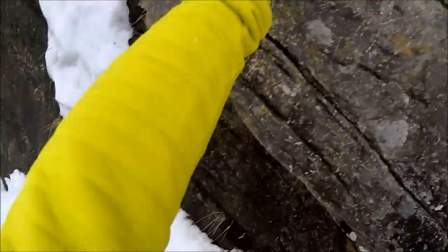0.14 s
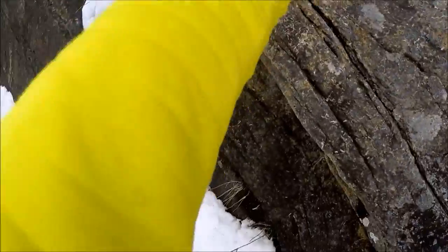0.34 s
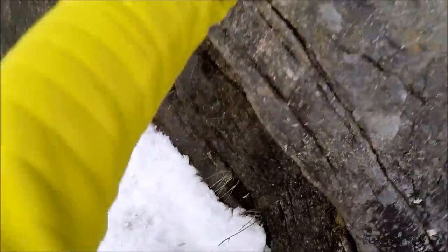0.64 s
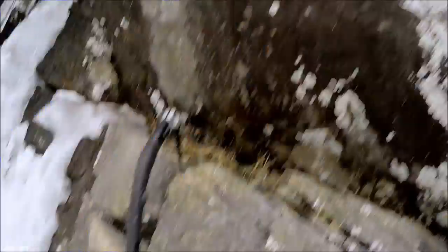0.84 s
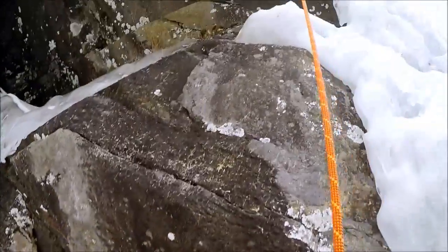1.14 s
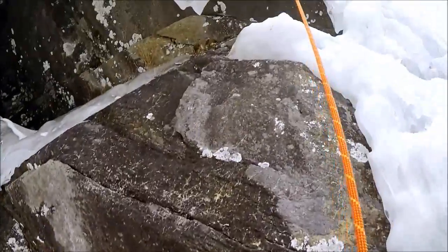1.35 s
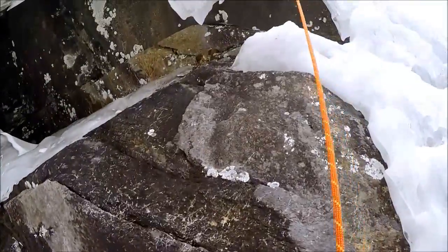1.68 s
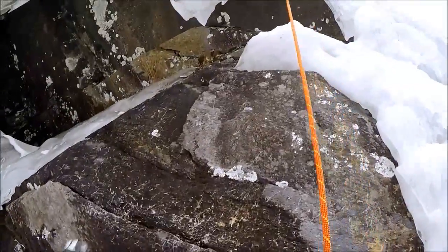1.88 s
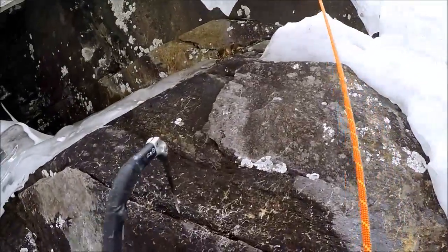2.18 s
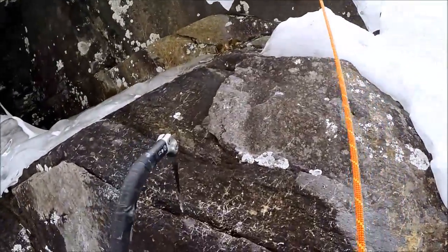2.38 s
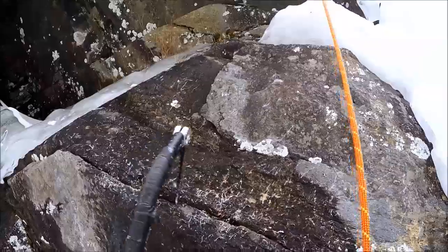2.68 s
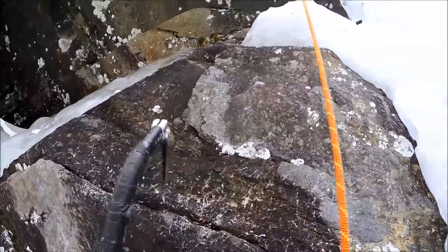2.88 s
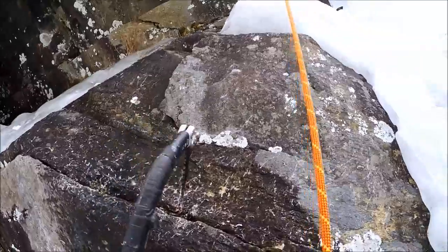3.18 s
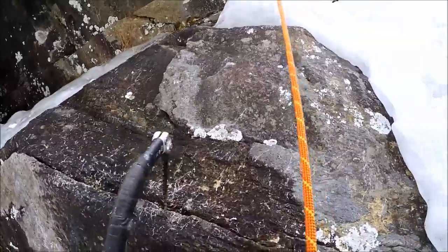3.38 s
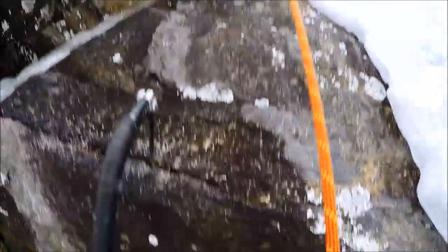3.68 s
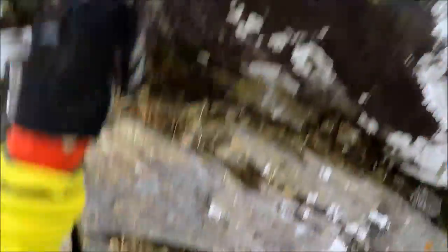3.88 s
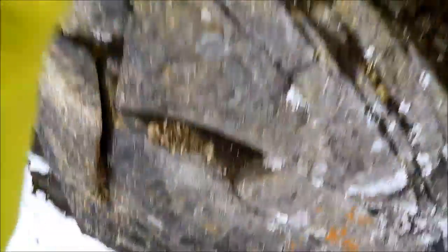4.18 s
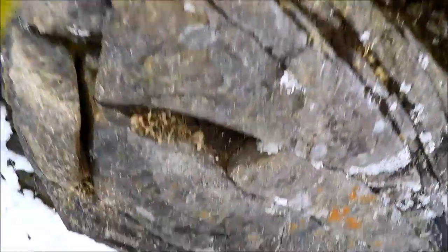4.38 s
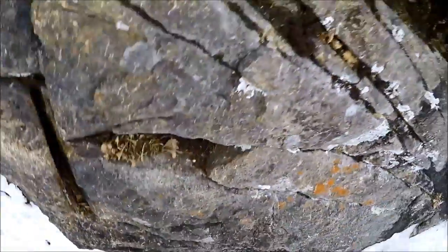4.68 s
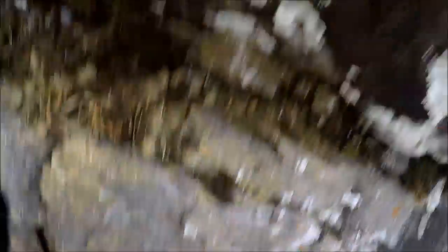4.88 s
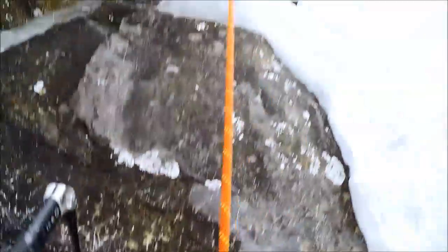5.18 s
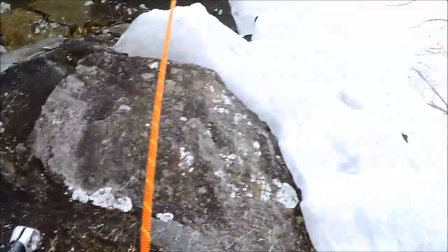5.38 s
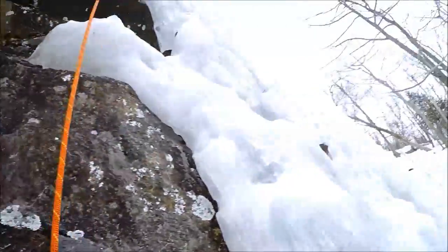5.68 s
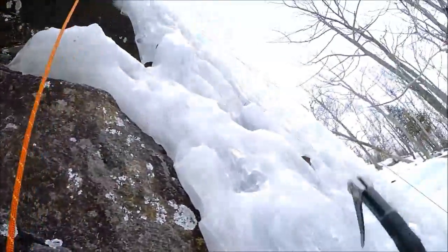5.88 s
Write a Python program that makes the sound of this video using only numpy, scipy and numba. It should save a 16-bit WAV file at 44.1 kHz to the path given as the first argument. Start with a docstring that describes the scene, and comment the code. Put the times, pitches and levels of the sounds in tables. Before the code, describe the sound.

Outdoors on a snowy rock step, heard from a small sealed camera on a climber's helmet. Low wind rumble, then almost at once a rapid clatter of hard, clipping knocks and gritty scraping on the housing. Steel tools tick and scuff on stone, with dull thuds and jacket rustle. A calmer middle leads to one violent knock around four seconds, a lighter scrape, then wind.

```python
"""Low wind rumble comes first, and almost at once hard knocks on a small sealed camera worn on a helmet.
The place is a rock step: gusts and head turns push slow pressure swings into the camera's one microphone.
Knocks and drags over rock ring the housing's modes; the hardest overload it and the gain ducks.
Between them noise bursts ring steel tools on stone, jolts thud through the helmet, filtered noise and
clicks make a jacket rustle, and wavering tones squeak a strap, over the camera's own hiss and whine."""
import sys
import numpy as np
from scipy import signal
from scipy.fft import rfft, irfft
from scipy.io import wavfile
from scipy.ndimage import uniform_filter1d
from numba import njit

SR = 44100
rng = np.random.default_rng(int(sys.argv[2]) if len(sys.argv) > 2 else 0)


def decibels_to_gain(level_db):
    """Convert a level in decibels to a linear amplitude gain (20 dB per decade)."""
    exponent = np.asarray(level_db, float) / 20
    return 10 ** exponent


def unload_audio(sound):
    """Save the sound as a 16-bit wav file, at the path given as the first command line argument."""
    columns = np.transpose(np.atleast_2d(sound))
    # keep every value between -1 and 1, then stretch to whole-number steps
    steps = np.round(np.clip(columns, -1, 1) * 32767)
    wavfile.write(sys.argv[1], SR, steps.astype(np.int16))


N = 266805
T = np.arange(N) / SR


def colour(x, shape):
    """Noise or clicks through a smooth spectrum of (Hz, dB) points, rms 1."""
    hz, db = np.transpose(shape)
    f = np.maximum(np.fft.rfftfreq(len(x), 1 / SR), 1)
    gain = decibels_to_gain(np.interp(np.log(f), np.log(hz), db))
    y = irfft(rfft(x) * gain, len(x))
    return y / np.sqrt(np.mean(y ** 2))


def ring(x, hz, t60):
    """One decaying mode; it falls 60 dB in t60 seconds and a unit impulse rings with amplitude near 1."""
    pole = np.exp(2j * np.pi * hz / SR - np.log(1000) / (t60 * SR))
    return signal.lfilter([1], [1, -pole], x).imag


def resonances(x, modes):
    """Sum of (Hz, width in Hz, dB) resonances with alternating signs, peak 1."""
    y = np.zeros(len(x))
    for k, (hz, width, db) in enumerate(modes):
        t60 = np.log(1000) / np.pi / width
        y += (-1) ** k * decibels_to_gain(db) * width * ring(x, hz, t60)
    return y / np.abs(y).max()


def favour(hz, near_hz, lift, spread):
    """Modes near the one that the point of contact favours get most of the lift."""
    return lift * np.exp(-(np.log(hz / near_hz) / spread) ** 2)


def walk(rate):
    """Random levels held 1 / rate seconds and slewed twice; spread near 1."""
    k = int(SR / rate)
    steps = np.repeat(rng.standard_normal(N // k + 1), k)
    return 1.4 * uniform_filter1d(uniform_filter1d(steps, k), k)[:N]


def crackle(rate, spread_db):
    """Clicks at random moments, rate per second, a few much larger than the rest."""
    u = rng.random((3, N))
    size = decibels_to_gain(-spread_db * np.log(1 - u[2]))
    return (u[0] < rate / SR) * np.sign(u[1] - 0.5) * size


def swells(curve, events, fall_per_rise):
    """Level in dB: a slow curve, plus bell-shaped swells whose fall time is fall_per_rise times the rise."""
    power = decibels_to_gain(2 * np.interp(T, *np.transpose(curve)))
    for s, db, rise in events:
        side = rise * np.where(T < s, 1, fall_per_rise)
        power += decibels_to_gain(2 * db) * np.exp(-((T - s) / side) ** 2)
    return 10 * np.log10(power)


def add(out, s, x):
    """Mix x into out from time s in seconds."""
    i = int(s * SR)
    out[i:i + len(x)] += x[:N - i]


# Modes of the camera's shell. Each row: pitch in Hz, relative level in dB, 60 dB decay time in s.
SHELL_MODES = [(128, -27.5, 0.029), (288.3, -24.5, .08), (388, -23.5, 0.042), (767.7, -3.5, 0.014),
               (921, 3, 0.014), (1382, -4.5, .024), (1655, -9.5, .022), (1880, -32.5, 0.13),
               (2230, -7, 0.022), (2790, -10.5, .018), (2900, -39.5, .09), (3075, -14, 0.012),
               (3900, -10, 0.013), (4900, -26, .012), (5500, -27, .009), (7300, -27.5, .006),
               (10800, -31, .006)]


def shell(drive, near_hz, lift_db):
    """The housing rings in its modes; the contact lifts the nearest and bends them to its pitch."""
    out = np.zeros(len(drive))
    for k, (hz, db, t60) in enumerate(SHELL_MODES):
        level = decibels_to_gain(db + favour(hz, near_hz, lift_db, 0.14))
        bent_hz = hz + (near_hz - hz) * favour(hz, near_hz, 0.8, 0.12)
        out += (-1) ** (k // 2) * level * ring(drive, bent_hz, t60)
    return out


# Knocks on the housing. Each row: start in seconds, relative force in dB, contact time in ms,
# favoured mode in Hz, crack level in dB, thump level in dB.
KNOCKS = [(0.1368, 17, 0.3, 868, 4, -10.5), (0.1572, 14, 0.25, 968, -7.5, -9),
          (0.177, 1, 0.16, 898, -29.5, -27.5), (0.185, -2.5, 0.12, 1380, -31.5, -33.5),
          (0.194, -3.5, 0.054, 890, -23, -28), (0.197, 12.5, 0.087, 1395, -8, -14),
          (0.2039, 12, 0.083, 1380, -2.5, -8.5), (.2135, -1, 0.13, 905, -24, -22.5),
          (.2235, -18, .12, 1390, -27.5, -28), (0.234, -4, 0.2, 1617, -28, -24),
          (4.0838, 22.5, 0.097, 3727, -21.5, -1.5), (4.1002, -20, 0.11, 4330, -27.5, -40),
          (4.7953, 9, 0.071, 821, -13.5, -19), (4.809, -16, 0.095, 1640, -28, -30),
          (4.8486, -12, 0.078, 1690, -19.5, -31), (4.8604, -8, 0.025, 1896, -23.5, -30.5),
          (4.8625, -12, 0.038, 2225, -18.5, -36), (4.868, -17, 0.046, 965, -15.5, -38)]
# Spectrum of the crack. Each row: frequency in Hz, relative density in dB per Hz.
CRACK_SPECTRUM = [(500, -17), (2500, 13.5), (6000, -4), (11000, -13), (15500, -16.5)]


def knocks():
    """A short push rings the shell, cracks as a noise burst and thumps the microphone's membrane."""
    thump_hz, thump_t60_s, thump_lag_s, crack_t60_s = 67, 0.1, 0.002, 0.011
    out, t = np.zeros(N), T[:12000]
    for s, force_db, contact_ms, near_hz, crack_db, thump_db in KNOCKS:
        push = np.exp(-(1000 * t / contact_ms - 2) ** 2)
        push /= push.sum()
        add(out, s, decibels_to_gain(force_db - 10) * shell(push, near_hz, 9.6))
        add(out, s + thump_lag_s, -decibels_to_gain(thump_db) * ring(push, thump_hz, thump_t60_s))
        crack = colour(rng.standard_normal(600), CRACK_SPECTRUM)
        add(out, s, decibels_to_gain(crack_db - 60 * t[:600] / crack_t60_s) * crack)
    return out


# Housing dragged along rock. Each row: start in seconds, length in seconds, level at the start in dB,
# level at the end in dB, grit level relative to these in dB, favoured mode in Hz.
DRAGS = [(0.141, 0.012, -23, -25, 0, 2250), (0.160, .035, -26, -18, -5, 960),
         (0.194, .039, -17, -21, -3, 1380), (4.798, 0.031, -22, -30, -7, 1400),
         (4.831, .019, -35, -29, -8, 2350), (4.850, 0.021, -27, -21, -3, 2700)]
# Spectrum of the grit. Each row: frequency in Hz, relative level in dB.
GRIT_SPECTRUM = [(60, -1), (230, 1), (700, -10), (1500, 3), (3000, -4.5), (5800, -8), (7200, -28.5),
                 (11000, -36), (15000, -38)]


def drags():
    """Small slips ring the shell while grit grinds; after each drag the contact lifts off at once."""
    lift_off_db_per_s = 3998
    out, t = np.zeros(N), T[:12000]
    slips = crackle(700, 3.7)
    # the edge bites and lets go a few hundred times a second
    bite = decibels_to_gain(2.5 * walk(250))
    sand = colour(crackle(9000, 1.8), GRIT_SPECTRUM) * bite
    for s, length, start_db, end_db, grit_db, near_hz in DRAGS:
        i = int(s * SR)
        here = slice(i, i + len(t))
        db = np.interp(t, [0, length], [start_db, end_db])
        db -= lift_off_db_per_s * np.maximum(t - length, 0)
        # the shell's answer to the unshaped slips sets the scale
        scale = shell(slips[here], near_hz, 6).std()
        rung = shell(decibels_to_gain(db) * slips[here], near_hz, 6) / scale
        add(out, s, 1.1 * rung + decibels_to_gain(db + grit_db) * sand[here])
    return out


# Wind on the microphone port. Each row: time in seconds, slow rumble level in dB.
WIND_LEVEL = [(0.0, -37), (0.55, -36), (1.15, -37), (1.85, -41), (2.1, -37.5), (2.45, -43.5), (2.9, -38),
              (3.5, -45.5), (3.95, -36.5), (4.45, -36.5), (5.0, -34.5), (5.5, -33), (5.9, -31.5),
              (6.05, -41.5)]
# Buffets as the head turns or a gust slaps the port. Each row: peak time in seconds, peak level in dB,
# rise in seconds.
BUFFETS = [(0.191, -18.5, 0.052), (.419, -17, 0.029), (.85, -27.5, 0.049), (0.955, -18.5, 0.005),
           (1.07, -26.5, 0.013), (1.33, -35.5, 0.035), (1.67, -40.5, .04), (2.181, -30.5, 0.035),
           (2.71, -36.5, 0.028), (3.8, -29.5, 0.078), (4.101, -18, 0.013), (4.271, -16.5, 0.055),
           (4.639, -27.5, 0.036), (4.83, -38, 0.024), (5.142, -19.5, 0.03), (5.64, -26.5, 0.041)]
# Spectra of the slow rumble and of the flutter. Each row: frequency in Hz, relative level in dB.
RUMBLE_SPECTRUM = [(15, -4), (26, 6.5), (52, 7), (64, -5), (80, -25), (140, -66.5), (400, -110)]
FLUTTER_SPECTRUM = [(50, -9.5), (90, 4.5), (170, -19.5), (400, -23), (900, -28.5), (2000, -55),
                    (6000, -97.5)]


def wind():
    """Slow pressure swings under the port's cut-off; a faster uneven flutter grows with them."""
    gust_db = swells(WIND_LEVEL, BUFFETS, fall_per_rise=1.2) + 2 * walk(6.8)
    rumble = colour(rng.standard_normal(N), RUMBLE_SPECTRUM)
    # a gust holds its strength over a few swings, so the envelope is evened out
    rumble /= np.sqrt(uniform_filter1d(rumble ** 2, size=2000) + 0.039)
    flutter_db = 1.072 * gust_db - 23 + 3.5 * walk(25)
    flutter = colour(rng.standard_normal(N), FLUTTER_SPECTRUM)
    return decibels_to_gain(gust_db) * rumble + decibels_to_gain(flutter_db) * flutter


# Modes of the steel and of its edge. Each row: pitch in Hz, width in Hz, relative level in dB.
STEEL_MODES = [(905, 130, -6), (1560, 54, 6), (1886, 270, 5), (2070, 350, 3.5), (2660, 280, -0.5),
               (3420, 250, 0), (3715, 300, -0.5), (4484, 1000, -9.5)]
EDGE_MODES = [(6013, 455, 7.5), (7610, 540, 2), (8360, 160, 5.5), (9970, 760, -1), (12990, 2500, -25.5)]
# Steel on stone. Each row: start in seconds, body peak in dB, edge peak in dB, favoured ring in Hz.
TICKS = [(0.0335, -48.5, -54, 1430), (0.665, -45.5, -38.5, 1600), (0.7718, -48, -71.5, 2120),
         (0.877, -40.5, -36.5, 1053), (0.8866, -27.5, -38, 2390), (0.9373, -41.5, -44, 3740),
         (0.954, -52, -55, 3600), (0.968, -44, -59, 1650), (1.0035, -40, -50, 1440),
         (1.038, -43.5, -61, 1640), (1.119, -55, -56, 2220), (1.1289, -43, -54, 1740),
         (1.176, -50, -58, 1660), (1.274, -44, -47, 1625), (1.3001, -43, -41.5, 1900),
         (1.3357, -61, -45.5, 1703), (1.625, -43.5, -43.5, 1726), (1.635, -49, -48, 1850),
         (1.6461, -38.5, -42, 3900), (1.6716, -32, -37, 3750), (1.729, -43.5, -58, 1560),
         (1.9092, -41.5, -53.5, 2790), (1.9852, -30, -71, 1900), (2.0418, -43.5, -54.5, 1950),
         (2.146, -42, -50.5, 2670), (2.37, -38.5, -56.5, 1950), (2.5457, -36, -50.5, 1580),
         (2.6903, -37, -47.5, 1400), (2.7027, -32, -49, 1950), (3.2581, -34.5, -51.5, 1820),
         (3.4129, -25.5, -37, 3720), (3.4266, -30, -46, 3530), (3.7714, -30, -37, 1870),
         (3.7823, -39, -55, 1730), (4.039, -48, -61, 1650), (4.1886, -38, -48, 1970),
         (4.222, -45, -63.5, 2020), (4.25, -40, -70, 2036), (4.299, -45, -72.5, 2050),
         (4.3343, -39.5, -46, 2090), (4.5391, -37.5, -69.5, 1720), (4.5753, -38.5, -59.5, 1450),
         (4.6, -42.5, -66, 2670), (4.611, -43, -42, 4310), (4.643, -44, -62, 1810),
         (4.6624, -39, -47, 2720), (4.718, -37, -47, 2645), (4.735, -45.5, -56.5, 2800),
         (4.764, -45, -59, 3060), (4.904, -46, -51, 2900), (5.0879, -35, -49, 1980),
         (5.1, -41.5, -54.5, 1700), (5.384, -52, -58, 1605), (5.68, -45.5, -62, 1950)]


def tools():
    """A crisp contact and a gritty tail of scuffing excite the steel; harder blows are drier."""
    contact_t60_s, scuff_t60_s = 0.016, 0.06
    out, t = np.zeros(N), T[:6000]
    for s, db, edge_db, near_hz in TICKS:
        # 9 dB below a -40 dB contact, and 0.7 dB further below for each dB harder
        scuff_db = -9 - 0.7 * (db + 40)
        envelope = decibels_to_gain(-60 * t / contact_t60_s) + decibels_to_gain(scuff_db - 60 * t / scuff_t60_s)
        burst = rng.standard_normal((2, len(t))) * envelope
        modes = [(hz, width, g + favour(hz, near_hz, 3.5, 0.21)) for hz, width, g in STEEL_MODES]
        # the free tip of the pick: its pitch depends on where it touches
        modes.append((near_hz, 0.11 * near_hz, 4))
        add(out, s, decibels_to_gain(db) * resonances(burst[0], modes))
        add(out, s, decibels_to_gain(edge_db) * resonances(burst[1], EDGE_MODES))
    return out


# Jolts of the body. Each row: start in seconds, peak level in dB.
JOLTS = [(0.031, -37.5), (0.384, -45), (0.887, -24), (1.04, -29.5), (1.984, -31.5), (2.142, -43),
         (3.78, -27), (4.188, -24.5), (4.283, -31), (4.465, -42), (4.481, -42.5), (4.538, -25.5),
         (5.087, -27.5), (5.113, -32)]
# Modes of the helmet. Each row: pitch in Hz, width in Hz, relative level in dB.
HELMET_MODES = [(90, 14, 12), (222.2, 110, -4.5), (693, 1500, -14)]


def jolts():
    """Dull thuds travel up the body into the helmet: short noise bursts through its modes."""
    out, t = np.zeros(N), T[:6000]
    for s, db in JOLTS:
        burst = rng.standard_normal(len(t)) * decibels_to_gain(-60 * t / 0.022)
        add(out, s, decibels_to_gain(db) * resonances(burst, HELMET_MODES))
    return out


# How much the climber shifts about. Each row: time in seconds, slow jacket level in dB.
RUSTLE_LEVEL = [(0, -68.5), (.65, -70), (1.0, -68), (1.5, -72), (2.3, -73), (3.0, -76), (3.7, -78.5),
                (4.1, -72.5), (5.3, -71), (6.05, -81.5)]
# Single moves of an arm. Each row: peak time in seconds, peak level in dB, rise in seconds.
MOVES = [(0.121, -56, 0.015), (.42, -60.5, 0.05), (0.779, -66, 0.027), (0.991, -60.5, 0.047),
         (1.15, -68, 0.033), (1.32, -58.5, 0.029), (1.63, -57.5, 0.012), (2.17, -59.5, 0.024),
         (2.379, -62, 0.023), (2.59, -65, 0.023), (3.79, -64, 0.025), (4.21, -52, 0.017), (4.3, -60, 0.018),
         (5.115, -58, 0.023), (5.302, -59, 0.013), (5.401, -58, 0.03)]
# Spectrum of the fabric. Each row: frequency in Hz, relative density in dB per Hz.
CLOTH_SPECTRUM = [(300, -26), (1100, -12), (1600, 0), (2000, -0.5), (2500, -7.5), (3600, -9), (4600, -16),
                  (8000, -19), (15000, -33.5)]


def jacket():
    """Stiff fabric: a hush with fine crackle whose level flickers; the same moves graze steel on stone."""
    creases = crackle(4000, 2.2)
    hush = 0.78 * rng.standard_normal(N)
    fibres = colour(creases + hush, CLOTH_SPECTRUM) * decibels_to_gain(4.5 * walk(150))
    scratch = resonances(crackle(200, 1.4), STEEL_MODES)
    # 3 dB below the cloth before its flicker
    scratch *= decibels_to_gain(-3) / np.sqrt(np.mean(scratch ** 2))
    level_db = swells(RUSTLE_LEVEL, MOVES, fall_per_rise=1) + 1.6 * walk(30)
    return (fibres + scratch) * decibels_to_gain(level_db)


# Squeaks of the strap. Each row: start in seconds, length in seconds, pitch in Hz, level in dB.
SQUEAKS = [(2.963, 0.085, 6530, -69), (3.732, 0.077, 6680, -71)]


def strap():
    """Thin squeaks, wavering in pitch and level, with a weak octave."""
    out, drift, waver = np.zeros(N), walk(27), walk(90)
    for s, length, hz, db in SQUEAKS:
        phase = 2 * np.pi * np.cumsum(hz * (1 + 0.004 * drift)) / SR
        # fades in and out over 11 ms
        swell = np.clip(np.minimum(T - s, s + length - T) / 0.011, 0, 1)
        tone = np.sin(phase) + 0.4 * np.sin(2 * phase)
        out += swell * decibels_to_gain(db + 4 * waver) * tone
    return out


# Spectrum of the preamplifier's hiss. Each row: frequency in Hz, relative level in dB.
HISS_SPECTRUM = [(100, -17), (200, -14), (500, -18.5), (1100, -23), (2500, -21), (6000, -28), (11000, -32),
                 (14500, -31), (16000, -59.5)]


def electronics():
    """Preamplifier hiss as shaped noise, and a steady thin whine as one sine; both levels are rms."""
    hiss_db, whine_db, whine_hz = -64.5, -75.5, 12407.5
    hiss = colour(rng.standard_normal(N), HISS_SPECTRUM)
    whine = np.sqrt(2) * np.sin(2 * np.pi * whine_hz * T)
    return decibels_to_gain(hiss_db) * hiss + decibels_to_gain(whine_db) * whine


def scene():
    """Everything reaches one microphone on the helmet."""
    handling = knocks() + drags()
    climber = tools() + jolts() + jacket() + strap()
    return (wind() + handling + climber + electronics())[None]


@njit
def duck(x, top, attack, hold, release):
    """Gain falls fast while the output overloads, waits, then climbs at a steady rate in dB."""
    y, gain, wait = np.empty(len(x)), 1., 0.
    for i in range(len(x)):
        y[i] = gain * x[i]
        if abs(y[i]) > top:
            gain, wait = gain * attack, hold
        elif wait > 0:
            wait -= 1
        else:
            gain = min(gain * release, 1.)
    return y


def band_limit(x):
    """A steep low-pass at the top of the band."""
    return signal.sosfilt(signal.butter(12, 16530, fs=SR, output="sos"), x)


def record(dry):
    """Gain control lags behind the blows, so their first swings clip; the top is cut."""
    fall_db_per_s, hold_s, climb_db_per_s = 5500, 0.15, 22
    ducked = duck(dry[0], 1.0, decibels_to_gain(-fall_db_per_s / SR), hold_s * SR, decibels_to_gain(climb_db_per_s / SR))
    clipped = np.clip(ducked, -0.92, 0.92)
    low_pass = signal.cheby2(8, 50, 16200, fs=SR, output="sos")
    mix = signal.sosfilt(low_pass, clipped)[None]
    return band_limit(mix)


dry = scene()
out = record(dry)
unload_audio(out)
```